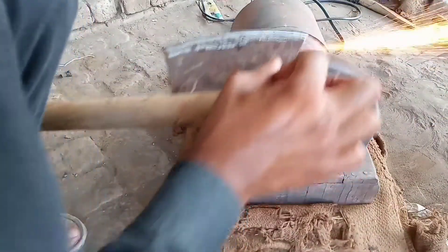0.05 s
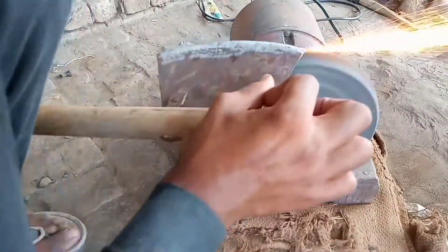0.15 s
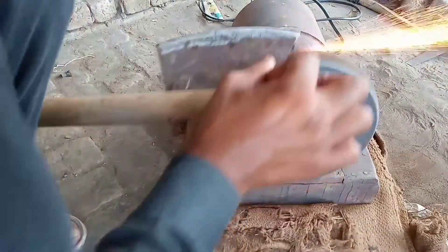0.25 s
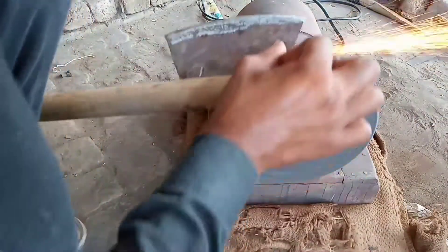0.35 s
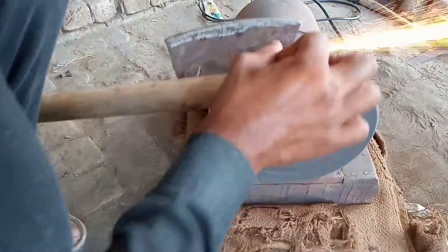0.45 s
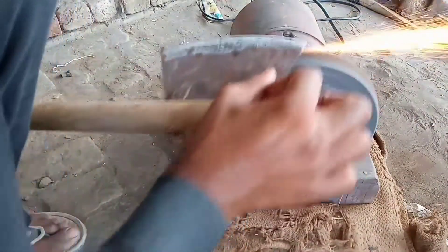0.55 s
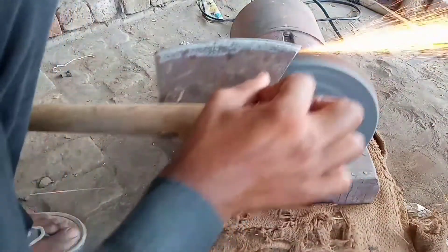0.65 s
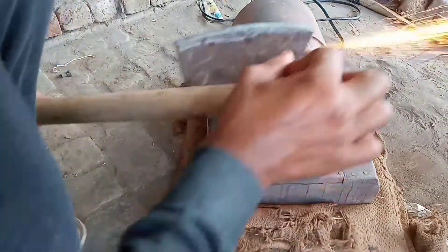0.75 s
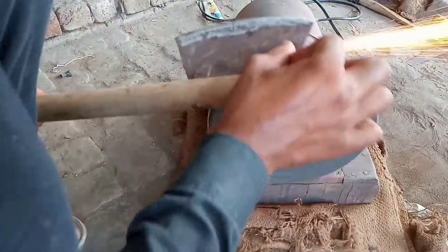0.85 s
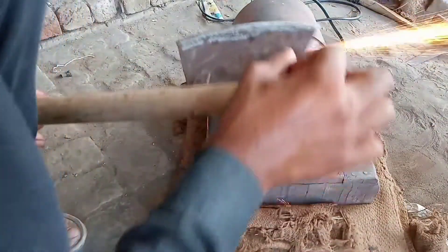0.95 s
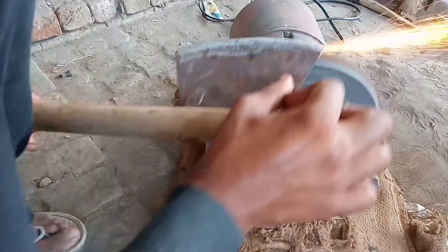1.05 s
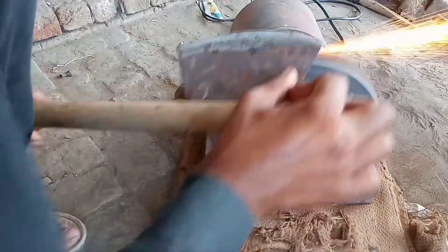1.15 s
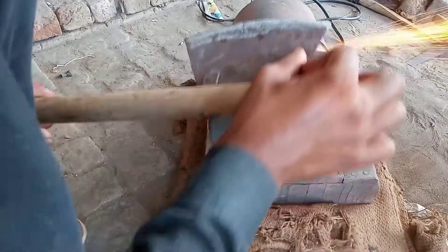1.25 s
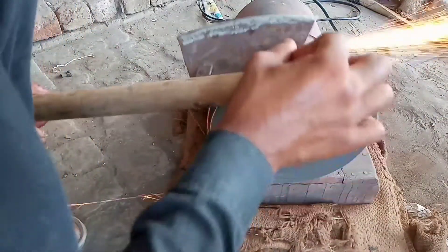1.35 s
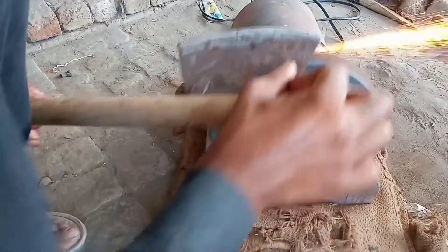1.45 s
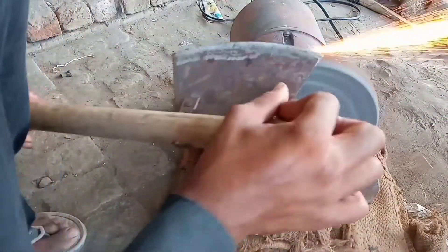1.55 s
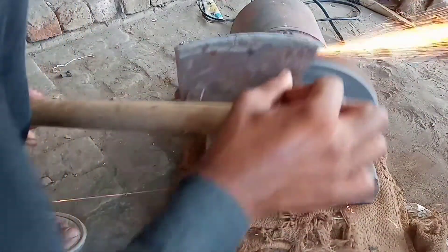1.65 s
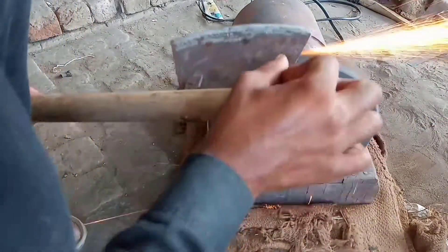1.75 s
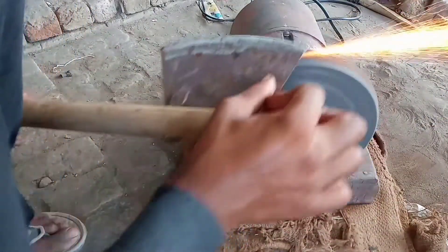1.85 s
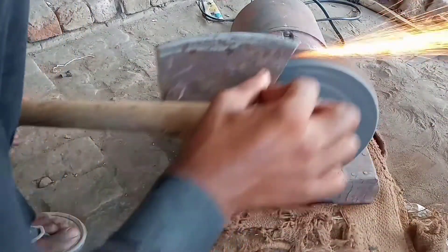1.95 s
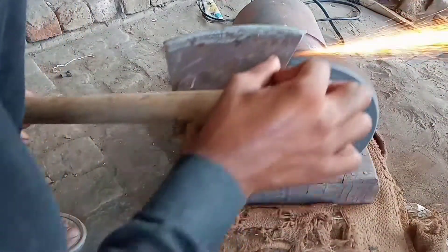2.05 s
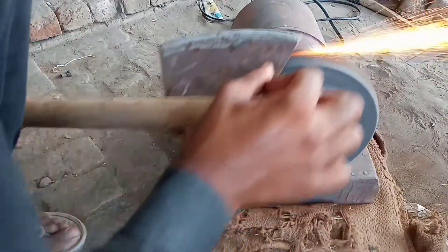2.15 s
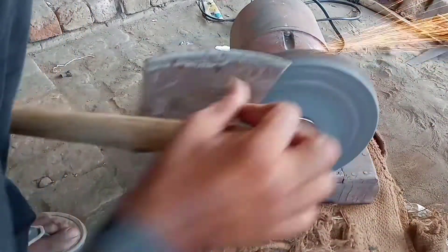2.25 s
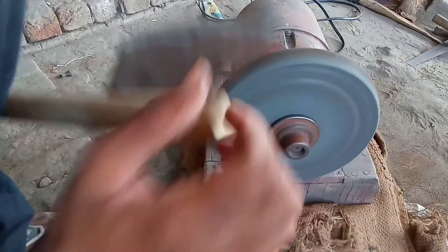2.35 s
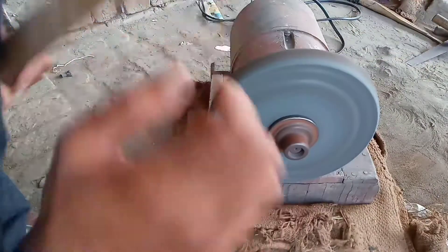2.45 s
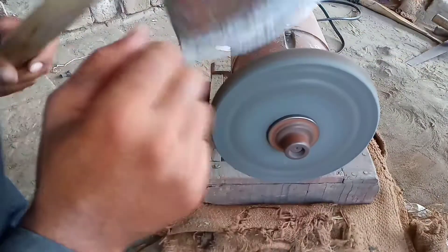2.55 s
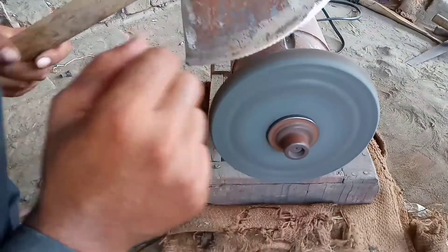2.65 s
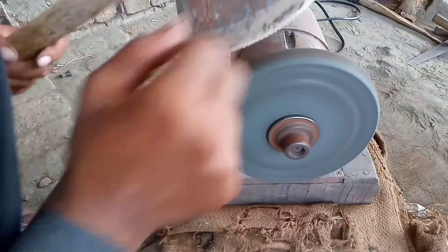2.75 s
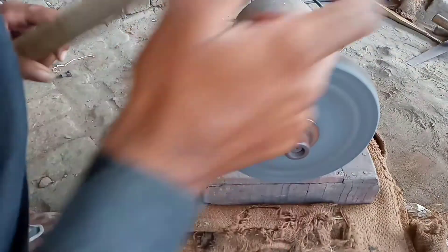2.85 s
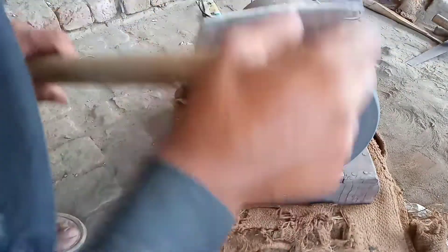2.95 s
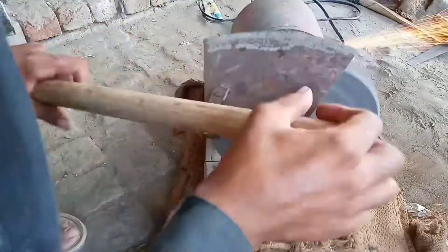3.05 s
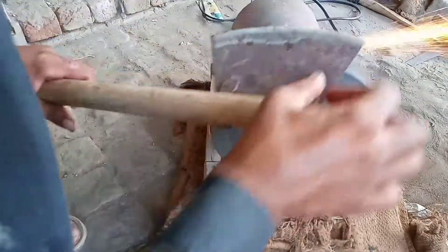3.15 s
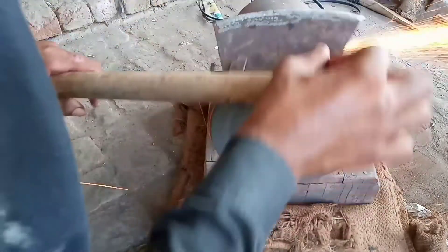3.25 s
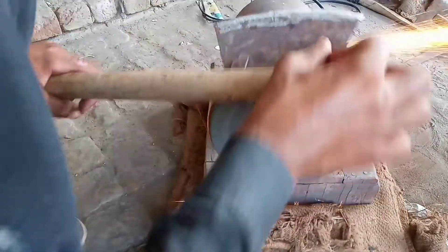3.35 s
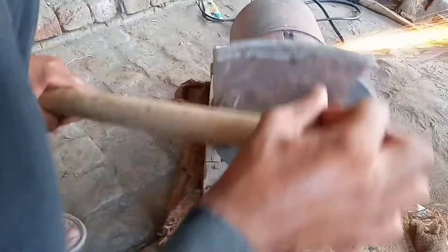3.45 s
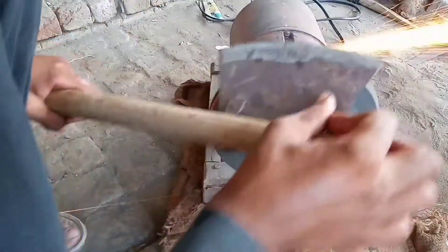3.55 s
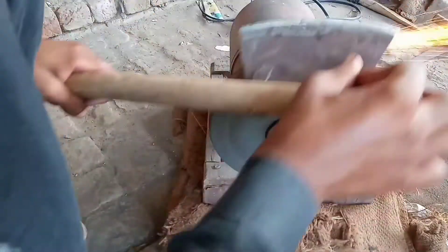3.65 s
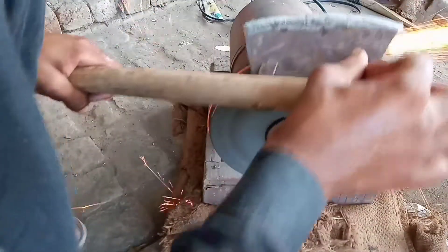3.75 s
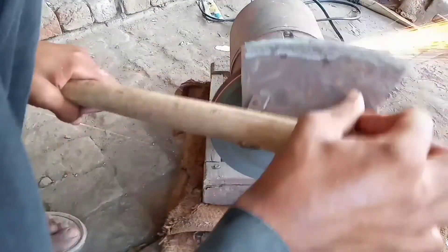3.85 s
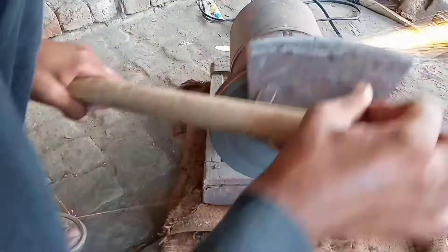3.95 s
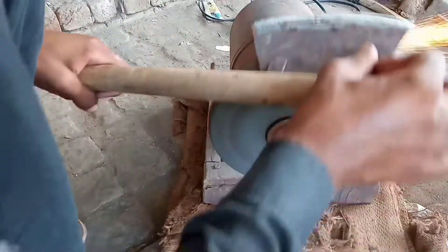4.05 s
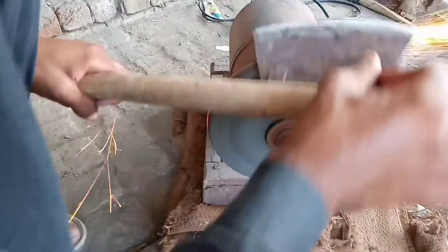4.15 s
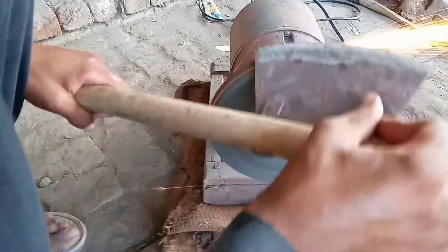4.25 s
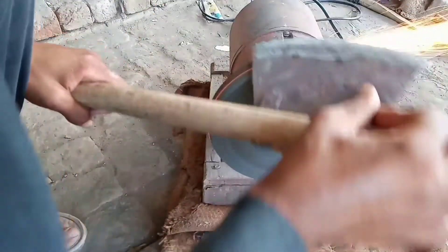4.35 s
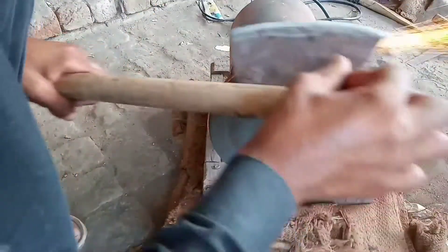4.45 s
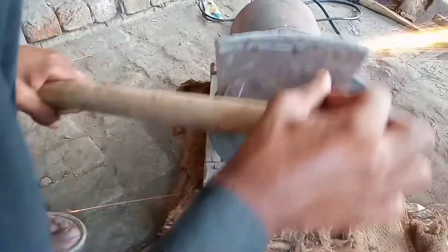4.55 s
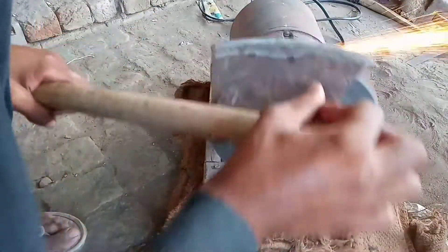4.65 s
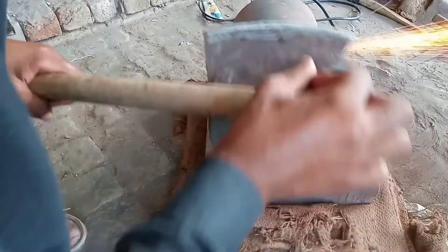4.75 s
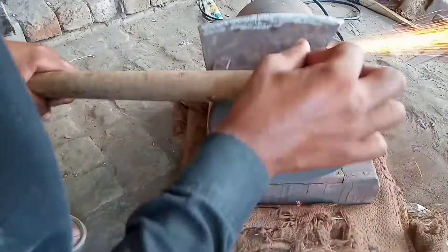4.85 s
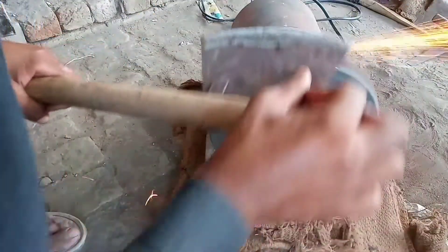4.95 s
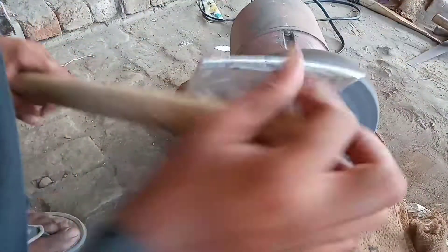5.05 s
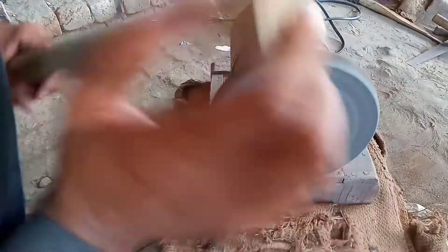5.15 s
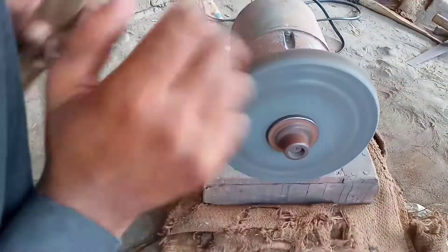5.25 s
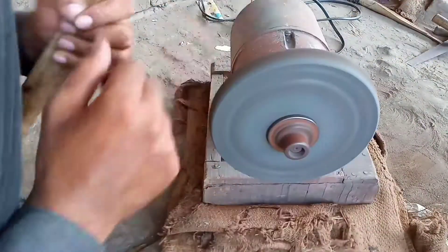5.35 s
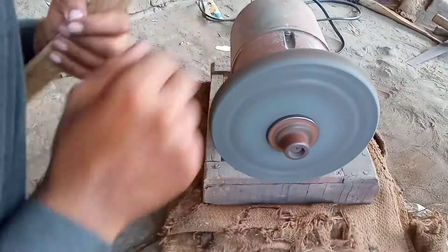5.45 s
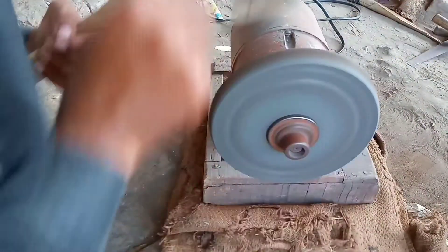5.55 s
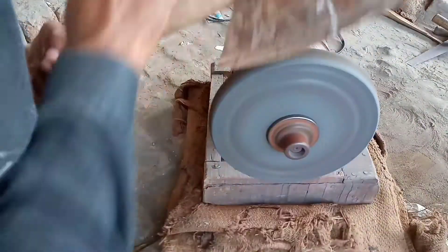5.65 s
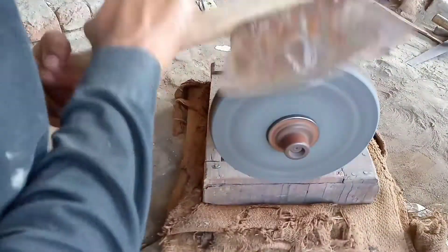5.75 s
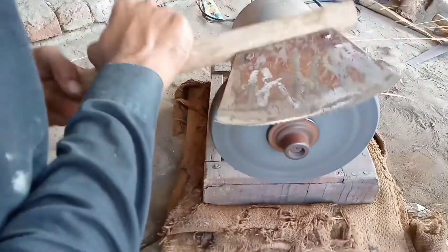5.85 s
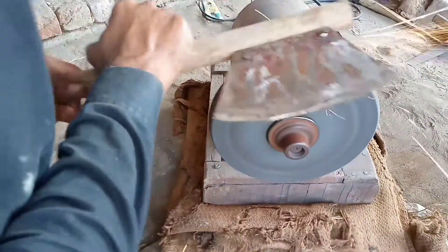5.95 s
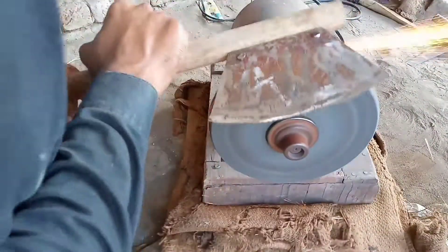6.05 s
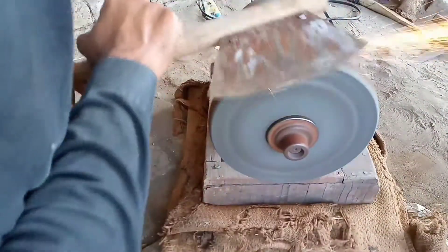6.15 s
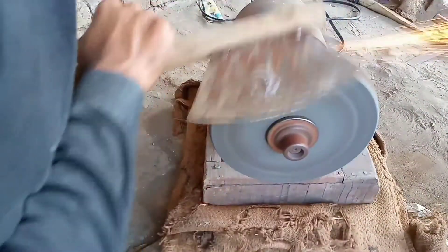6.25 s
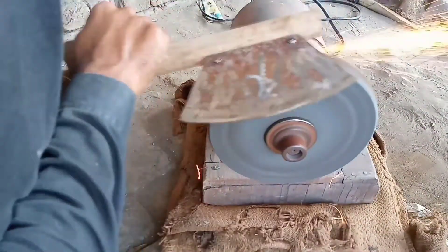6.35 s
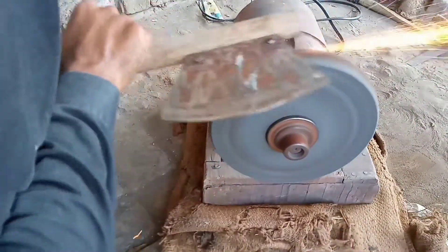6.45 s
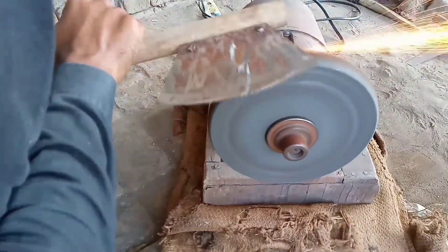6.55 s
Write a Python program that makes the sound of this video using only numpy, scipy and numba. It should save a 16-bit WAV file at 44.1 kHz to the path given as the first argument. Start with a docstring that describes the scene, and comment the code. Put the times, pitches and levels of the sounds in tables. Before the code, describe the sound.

A bench grinder whirrs steadily under bright, abrasive scraping of a steel blade. Two passes of about two seconds each surge and ease with the hand, with low wooden base rumble and steely ringing. Between them only the whirr, shaft hum and bearing ticks remain, growing louder. A cluster of hard knocks starts the last brief pass. Closely miked, with a short, slight workshop reflection.

```python
"""The first sound is an axe already grinding on a bench grinder, close by: two long passes, then a short one.
Grit rakes the chattering steel as the hand pushes in strokes; filters shape hiss, rasp, base rumble and thump.
The place of contact picks which modes of the axe head ring. The grinder's whirr, shaft hum and bearing ticks
are heard to grow louder in each pause and drop just before contact. Knocks and bounces are short bites
of grit that also kick the ringing modes. A faint, short room tail surrounds it all."""
import sys
import numpy as np
from scipy import signal
from scipy.fft import rfft, irfft
from scipy.io import wavfile
from scipy.ndimage import uniform_filter1d
from numba import njit

SR = 44100
rng = np.random.default_rng(int(sys.argv[2]) if len(sys.argv) > 2 else 0)


def store_pcm(level_fs):
    """Save levels as 16-bit WAV."""
    pcm = np.round(np.clip(level_fs, -1, 1) * 32767).astype(np.int16)
    wavfile.write(sys.argv[1], SR, np.atleast_2d(pcm).T)


N = 290619
T = np.arange(N) / SR  # time of every sample, s
TOP_HZ = 15550  # upper limit of the recorder
SHAFT_HZ = 78.7  # mean turning rate of the shaft

# Blade on the wheel; rasp, hiss and thump are relative, before their overall trims:
# (from [s], to [s], level [dB], rasp [dB], fine hiss [dB], wheel thump [dB])
PASSES = [(0, 2.297, -27, -7, -14.5, -17), (3.098, 5.088, -26.5, -3.5, -14.5, -24),
          (5.989, 6.6, -27.5, -7, -16, -29)]
# Pushes of the hand: (middle [s], length [s], push [dB], extra base rumble [dB], extra rasp [dB],
# place on the edge [0-1])
STROKES = [(0.107, 0.27, 6, -5, 1, 0.17), (0.284, 0.32, 4, -2, -3.5, 0.37),
           (0.48, 0.17, -1, 0.5, -3.5, 0.22), (0.664, 0.35, 4.5, 3, 1.5, 0.4), (0.8, 0.23, 3, -2, 1.5, 0.1),
           (1.059, 0.2, 5.5, 1, 5, 0.74), (1.22, 0.31, 4, -0.5, 3, 0.66), (1.553, 0.22, 2, 1, 1, 0.67),
           (1.76, 0.33, 3.5, -7.5, 1, 0.15), (1.948, 0.21, 1.5, -1, -1.5, 0.57),
           (2.203, 0.24, 7, 1.5, -2, 0.29), (3.137, .12, 1.5, 1.5, 3, 0.53),
           (3.306, 0.22, -1.5, -3.5, 2.5, 0.92), (3.448, 0.17, 3, 0, 9.5, 0.75),
           (3.578, 0.33, 4.5, 3.5, 2.5, 0.59), (3.9, 0.25, 2.5, 3, 1.5, 0.64),
           (4.03, 0.2, 2, 2.5, 0.5, 0.4), (4.348, 0.48, 3, 4.5, 1, 0.71), (4.69, 0.31, 2.5, 5.5, -1, 0.56),
           (4.91, .16, -3.5, 1, 2, 0.14), (5.016, 0.12, 2.5, 4, 1.5, 0.37), (6.438, 0.43, 3, 3, 2, 0.22),
           (6.57, 0.2, 4.5, -1, -2.5, 0.96)]
# Blade striking the wheel; ring is relative to the blow, before trim and place:
# (time [s], force [dB], bite decay [s], ring [dB], place on the edge [0-1])
KNOCKS = [(0.364, -17.5, 0.0029, -21, .5), (1.493, -18, 0.0036, 7, 0.9), (2.236, -13, 0.0024, -16, .8),
          (2.277, -19.5, 0.019, -10, 0.6), (3.077, -11.5, 0.0037, 0.5, 0.4), (3.096, -17, 0.0086, -3, 0.9),
          (3.122, -22, 0.0085, 12, 0.62), (3.363, -21, .005, -8, .8), (3.425, -20, .005, 3, 0.87),
          (3.448, -16, 0.0023, -7, 0.1), (3.468, -11, 0.0013, -20, .8), (3.804, -11, 0.002, -15, .5),
          (5.883, -15, 0.0032, -7, .9), (5.889, -15, 0.0064, 1.5, 0.93), (5.943, -6, 0.0029, -13, .9),
          (6.001, -16, .0026, 4, 0.1), (6.009, -18, .0035, -9, .3), (6.037, -14, 0.0026, 2.5, 0.72),
          (6.042, -20, 0.003, -12, .3), (6.075, -19, 0.005, -7, .1), (6.108, -9, 0.0016, -6, .4),
          (6.117, -17, 0.0031, -20, 0), (6.364, -19, 0.007, -11, 0.4)]
# Strongest modes of the axe head: (frequency [Hz], width when free [Hz], relative level [dB])
MAIN_MODES = [(2435, 13, -2), (2720, 20, -4), (3679, 7.6, -1.5)]
# Where each main mode is driven best: (place on the edge [0-1], relative drive [dB])
ANTINODES = [(0.56, -3.5), (0.07, 0), (1, 1)]
# Weaker modes of the head: (frequency [Hz], width [Hz], relative level [dB])
HEAD_MODES = [(2560, 70, 0), (3790, 80, -2), (3970, 70, -3), (4230, 60, -1), (4520, 80, 6), (4990, 90, -2),
              (5380, 60, -1), (6030, 44, 9.5), (6620, 50, 2), (7120, 55, 6), (7280, 55, 9), (7805, 40, 10),
              (8005, 36, 8), (8535, 50, 9), (9005, 60, 7), (9590, 100, 5), (10900, 70, 4), (11400, 130, 2),
              (12500, 80, 6), (12910, 90, 7), (13400, 130, 5), (14600, 70, 11), (15400, 70, 5)]
# Tone colour of the main scrape, only relative levels matter: (frequency [Hz], level [dB])
SCRAPE = [(400, -33), (700, -26.5), (1500, -12), (2050, -5.5), (2600, 1.5), (3200, 2), (4000, -2),
          (4450, -10), (4900, -14.5), (6000, -40)]
# Tone colour of the fine hiss: (frequency [Hz], relative level [dB])
HISS = [(3500, -30.5), (4400, -23.5), (5000, 0), (5700, -5), (6400, -0.5), (7100, -2), (7550, -12.5),
        (8800, -17.5), (10400, -18), (13200, -19), (16000, -29.5)]
# Tone colour of the rasp: (frequency [Hz], relative level [dB])
RASP = [(600, -36), (1050, -7.5), (1270, 6.5), (1450, 6), (1620, 7.5), (1850, 4.5), (2200, -8.5),
        (3200, -51)]
# Tone colour of the wooden base: (frequency [Hz], relative level [dB])
BASE = [(25, -25), (70, -7), (130, 1), (250, -1), (500, -2), (800, 2.5), (1100, -8), (1500, -45),
        (2400, -47)]
# Tone colour of the low wheel thump: (frequency [Hz], relative level [dB])
THUMP = [(35, -9), (62, 3), (76, 0), (92, 24), (130, -6), (200, -9), (300, -35)]
# Tone colour of the running machine: (frequency [Hz], relative level [dB])
MACHINE = [(25, -15), (70, -8), (170, -3), (370, 2), (470, -6), (620, -7), (900, -5.5), (1500, -8),
           (2250, -15), (3000, -13.5), (3700, -12), (3970, -21.5), (4200, -33), (5700, -42), (6400, -35.5),
           (7200, -39), (8100, -57.5), (15000, -66)]
# Resonances of housing and wheel: (frequency [Hz], width [Hz], level over the machine noise [dB])
HOUSING = [(535, 40, 15.5), (1320, 32, 16), (1900, 60, 7), (2560, 40, 1), (2730, 18, 8)]
# Hum of the shaft: (multiple of its turning rate [1], relative level [dB])
HUM = [(3, -25), (4, -22), (5, -21), (7, -10.5), (17, -15.5)]
# Tone colour of the bearing ticks: (frequency [Hz], relative level [dB])
TICK = [(500, -32), (1400, -36), (3700, 18.5), (4500, -17), (6900, -2), (8200, -19), (9000, -31),
        (9420, -8), (9900, -30), (15000, -35)]
# Pauses in which the whirr is heard to grow louder: (from [s], to [s], rise of the heard level [dB/s])
PAUSES = [(2.31, 3.07, 12), (5.1, 5.856, 15.5)]

# rasp that is lost per dB of push [dB]; base rumble before its trim [dB]; unsteadiness of the hand [dB]
RASP_LAG, RUMBLE_DB, TREMOR_DB = 0.99, -9, 1
# hiss lost per dB of push; hiss and thump gained per dB of extra rumble [dB]
HISS_LAG, HISS_PER_RUMBLE, THUMP_PER_RUMBLE = 0.16, 0.28, 0.71
# chatter share at zero push [0-1], its fall per dB of push, its extra on landing, settling time [s]
LOOSE, STEADYING_PER_DB, LANDING_LOOSE, SETTLE_S = 0.48, .02, 0.13, 0.62
# fall of mode drive over the whole edge, and flicker of the ringing [dB]
NODE_FALL_DB, RING_FLICKER_DB = 22.5, 1
# time before a knock when contact is weaker [s], and the share lost [0-1]
SKIP_S, SKIP_DEPTH = .012, 0.3
CHOKE_HZ = 170  # width that a blow adds to the main modes, per unit of force
# heard whirr level outside the pauses, before its trims [dB]; time its drop takes after a pause [s]
WHIRR_DB, WHIRR_DROP_S = -39, 0.02


def undb(db):
    """Turn decibels into gain."""
    return 10 ** (np.asarray(db) / 20)


def unit(x):
    """Scale the average strength (rms) to 1."""
    return x / np.sqrt(np.mean(x ** 2))


def curves(rows):
    """Join the columns of a timed table with straight lines."""
    s, *columns = np.transpose(rows)
    return [np.interp(T, s, column) for column in columns]


def walk(rate):
    """Drift between random levels, rate times a second; rms 1."""
    knots = rng.standard_normal(int(rate * T[-1]) + 3)
    return unit(np.interp(T * rate + rng.random(), np.arange(len(knots)), knots))


def colour(x, points, size=2048):
    """Filter through a tone colour, falling steeply above its last point; white noise keeps its power."""
    hz, db = np.transpose(points)
    bins = np.maximum(np.fft.rfftfreq(size, 1 / SR), 1)
    gain = undb(np.interp(np.log(bins), np.log(hz), db))
    gain = gain / np.maximum(bins / hz[-1], 1) ** 5
    # fold the cepstrum so that the filter answers as early as possible, never before its input
    cepstrum = irfft(np.log(gain))
    cepstrum[1:size // 2] *= 2
    cepstrum[size // 2 + 1:] = 0
    response = irfft(np.exp(rfft(cepstrum)))
    return signal.fftconvolve(x, response / np.linalg.norm(response))[:N]


@njit
def resonate(x, hz, width):
    """One ringing mode with movable pitch and damping: velocity is real, displacement imaginary."""
    y, z, pole = np.empty(len(x), np.complex128), 0j, 0j
    for i in range(len(x)):
        if i % 32 == 0:
            pole = np.exp((2j * np.pi * hz[i] - np.pi * width[i]) / SR)
        z = z * pole + x[i] + 1e-18
        y[i] = z
    return y


def mode(x, hz, width):
    """A resonance scaled to a gain of 1 at its centre."""
    velocity = resonate(x, hz + np.zeros(N), np.full(N, 1. * width)).real
    return velocity * 2 * np.pi * width / SR


def fade(x, seconds):
    """Give every pulse an exponential tail."""
    return signal.lfilter([1], [1, -np.exp(-1 / (seconds * SR))], x)


def grains(rate, spread_db):
    """Random impacts of very unequal size, rate a second on average; rms 1."""
    hit = rng.random(N) < rate / SR
    size = undb(spread_db * np.clip(rng.standard_normal(N), -2, 2))
    return unit(hit * size * rng.choice([-1, 1], N))


def bounces(rate_hz, jitter, spread_db, contact_s):
    """Contacts at uneven gaps and strengths, each dying away smoothly; rms 1."""
    gap, size = rng.standard_normal((N // 100, 2)).T
    at = (np.cumsum(np.exp(jitter * gap)) * SR / rate_hz).astype(int)
    inside = at < N
    kicks = np.zeros(N)
    kicks[at[inside]] = undb(spread_db * np.clip(size, -2, 2))[inside]
    return unit(fade(kicks, contact_s))


def current_pass():
    """The columns of PASSES, each held until the next pass begins."""
    rows = np.array(PASSES)
    index = np.searchsorted(rows[:, 0], T, side="right") - 1
    return rows[np.maximum(index, 0)].T


def swell(s, length_s):
    """A smooth rise and fall (0-1) centred on s."""
    return np.cos(np.pi * np.clip((T - s) / length_s, -.5, .5)) ** 2


def hand():
    """Strokes set push, extra rumble and rasp (dB), and a place of contact that slides between them."""
    push, rumble, rasp = sum(np.outer(dbs, swell(s, length)) for s, length, *dbs, _ in STROKES)
    place = curves(STROKES)[-1]
    return push + TREMOR_DB * walk(12), rumble, rasp, place


def grit(push, release_s=0.0019):
    """Grains rake the steel in bunches as it hops; returns the force and the contact (0-1)."""
    start, end, *_ = current_pass()
    # the first pass is already under way
    landing = (start > .5) * np.exp(-np.abs(T - start) / SETTLE_S)
    loose = np.clip(LOOSE - STEADYING_PER_DB * push + LANDING_LOOSE * landing, 0, 1)
    chatter = bounces(rate_hz=84, jitter=.33, spread_db=-0.7, contact_s=0.0038)
    load = 1 - loose + loose * chatter
    # the hand sets the average force, so even out the load over 1/16 s
    load /= np.sqrt(uniform_filter1d(load ** 2, SR // 16))
    touching = uniform_filter1d(1. * (T <= end), int(release_s * SR))
    return grains(rate=10000, spread_db=4.5) * load * touching, touching


def head(steel):
    """Many head modes come and go, and bend a little, as the contact crosses their nodes."""
    wander_db, bend, spacing, width, direct = 3.5, .0025, 330, 95, .35  # spacing and width in Hz
    out = direct * steel
    for hz, own_width, db in HEAD_MODES:
        drive = steel * undb(db - 3 + wander_db * walk(16))
        out += mode(drive, hz * (1 + bend * walk(12)), own_width)
    # between them lies a crowd of short-lived resonances with sliding pitch
    for hz in np.arange(1400, TOP_HZ, spacing) + spacing * rng.random():
        drive = steel * undb(wander_db * walk(20) - 4.5)
        out += rng.choice([-1, 1]) * mode(drive, hz + spacing / 2 * walk(5), width)
    return out


def coupling_db(place, antinode):
    """A mode is driven less the farther the contact lies from its best place, the antinode."""
    return -NODE_FALL_DB * np.abs(place - antinode)


def main_ringing(force, place, touching, kicks, choke, contact_width_hz=25, bend=0.0052):
    """The strongest modes ring; touching the wheel damps them and makes their pitch waver."""
    out = np.zeros(N)
    for (hz, free_width, db), (antinode, drive_db), kick in zip(MAIN_MODES, ANTINODES, kicks):
        width = free_width + contact_width_hz * touching + choke
        ring_db = db + drive_db + coupling_db(place, antinode) + RING_FLICKER_DB * walk(10)
        # make up for the width, so damping alone does not quieten the steady ringing
        drive = force * undb(ring_db) * np.sqrt(4 * np.pi * width / SR)
        moving_hz = hz * (1 + bend * touching * walk(17))
        out += resonate(drive + kick, moving_hz, width).imag
    return out


def axe(scrape_db=-2.0, hiss_db=-3, rasp_db=0.5, base_db=-3, thump_db=-3):
    """Grit and blows drive the steel head, and through the wheel the wooden base."""
    _, _, level, rasp, hiss, thump = current_pass()
    push, rumble, extra_rasp, place = hand()
    raking, touching = grit(push)
    force = raking * skips() * undb(level + push)
    blows, kicks, choke = knocks()

    scrape = colour(force * undb(scrape_db) + blows * undb(-3.5), SCRAPE)
    hiss_level = hiss + hiss_db - HISS_LAG * push + HISS_PER_RUMBLE * rumble
    fine_hiss = colour(force * undb(hiss_level) + blows * undb(-17), HISS)
    out = head(scrape + fine_hiss)
    out += main_ringing(force, place, touching, kicks, choke)

    rasp_level = rasp + extra_rasp + rasp_db - RASP_LAG * push
    out += colour(force * undb(rasp_level) + blows * undb(-4.0), RASP)
    out += colour(force * undb(RUMBLE_DB + rumble + base_db) + blows * undb(-5.5), BASE)
    thump_level = thump + thump_db + THUMP_PER_RUMBLE * rumble
    return out + colour(force * undb(thump_level), THUMP)


def heard_whirr_level():
    """Heard level of the whirr (dB): it climbs in each pause, then drops just before contact."""
    level = WHIRR_DB
    for start, end, rise in PAUSES:
        climb = rise * np.clip(T - start, 0, end - start)
        level = level + climb * np.clip(1 - (T - end) / WHIRR_DROP_S, 0, 1)
    return level


def grinder(whirr_db=-4, hum_db=-1, tick_db=-19, flutter_db=2.6, waver=0.0049):
    """Bearings and wheel wind rush through the resonant housing; the shaft hums and the bearings tick."""
    noise = rng.standard_normal(N) * undb(flutter_db * walk(150))
    rush = colour(noise, MACHINE)
    rush = rush + sum(undb(db) * mode(rush, hz, width) for hz, width, db in HOUSING)
    turn = 2 * np.pi * np.cumsum(SHAFT_HZ * (1 + waver * walk(20))) / SR
    hum = sum(np.sqrt(2) * undb(db + 2 * walk(16)) * np.sin(k * turn) for k, db in HUM)
    ticks = bounces(rate_hz=64, jitter=0.21, spread_db=5.5, contact_s=0.0016) * rng.standard_normal(N)
    machine = undb(whirr_db) * rush + undb(hum_db) * hum + undb(tick_db) * colour(ticks, TICK)
    return machine * undb(heard_whirr_level())


def skips():
    """Share of the contact that is left while the blade skips just before each knock."""
    skipping = np.any([(T > s - SKIP_S) & (T < s) for s, *_ in KNOCKS], axis=0)
    return 1 - np.clip(SKIP_DEPTH, 0, 1) * skipping


def knocks(ring_db=-0.5, rise_s=0.00056):
    """Blows are short bites of grit; returns their force, main-mode kicks and added damping (Hz)."""
    bites, kicks = np.zeros(N), np.zeros((len(MAIN_MODES), N))
    antinodes = np.array(ANTINODES)[:, 0]
    for s, db, bite_s, own_ring_db, place in KNOCKS:
        start = int(s * SR)
        t = T[:min(SR // 10, N - start)]
        bite = np.exp(-t / bite_s) * (1 - np.exp(-t / rise_s))
        bites[start:start + len(t)] += undb(db) * bite
        kicks[:, start] = undb(db + ring_db + own_ring_db + coupling_db(place, antinodes))
    return bites * grains(rate=16000, spread_db=3), kicks, CHOKE_HZ * bites


def workshop(x, t60_s, wet_db, first_s):
    """Short, faint reflections from the floor and clutter, made as a fading noise tail."""
    t = T[:SR // 2]
    tail = rng.standard_normal(len(t)) * undb(-60 * t / t60_s) * (t > first_s)
    return x + undb(wet_db) * signal.fftconvolve(x, tail / np.linalg.norm(tail))[:N]


def scene():
    """The axe on the running grinder, in the room."""
    return workshop(axe() + grinder(), t60_s=0.15, wet_db=-14.0, first_s=0.0025)[None]


def record(dry):
    """The recorder rounds the highest peaks and cuts the top of the treble."""
    ceiling = .9
    rounded = ceiling * np.tanh(dry / ceiling)
    low_pass = signal.ellip(10, .2, 70, TOP_HZ, fs=SR, output="sos")
    return signal.sosfilt(low_pass, rounded)


dry = scene()
out = record(dry)
store_pcm(out)
```